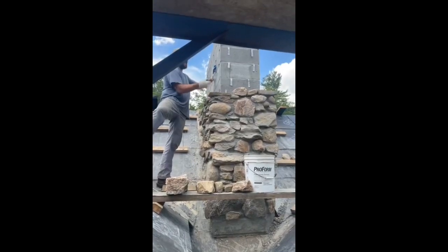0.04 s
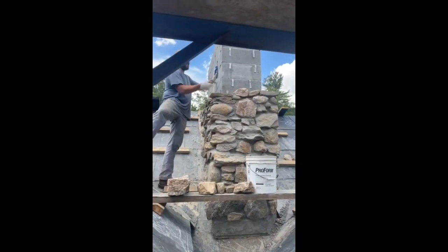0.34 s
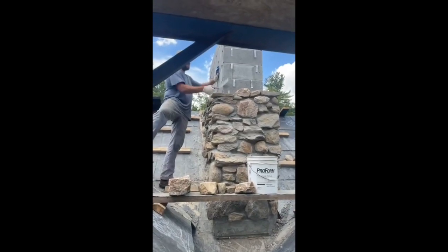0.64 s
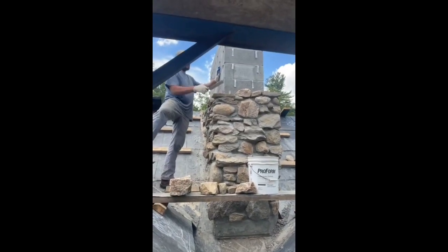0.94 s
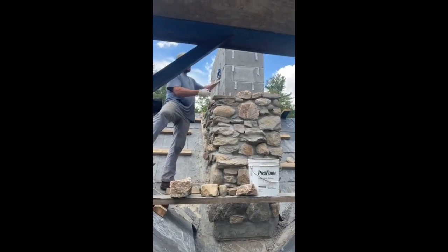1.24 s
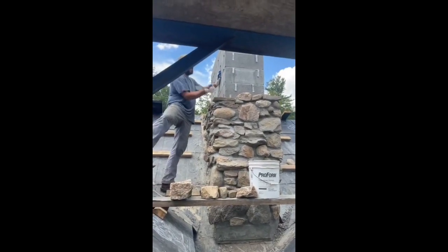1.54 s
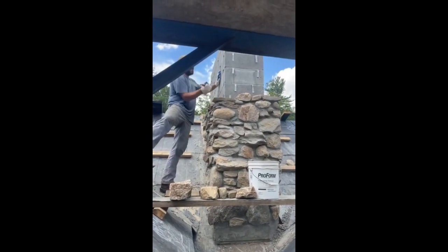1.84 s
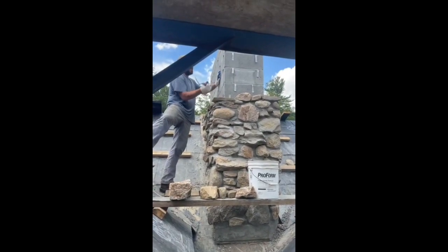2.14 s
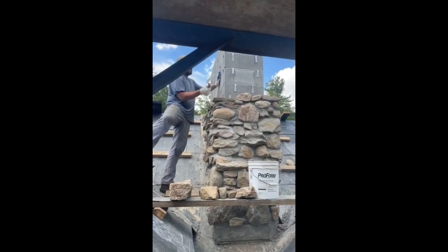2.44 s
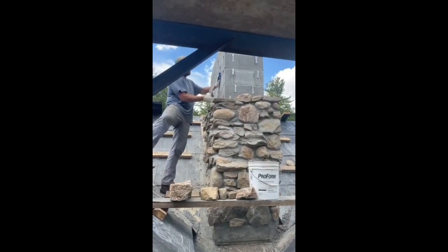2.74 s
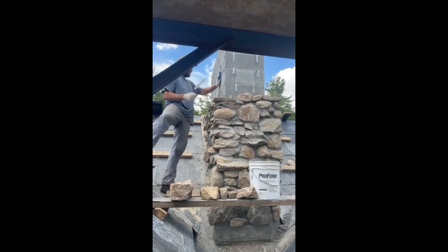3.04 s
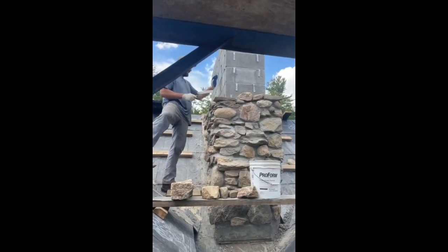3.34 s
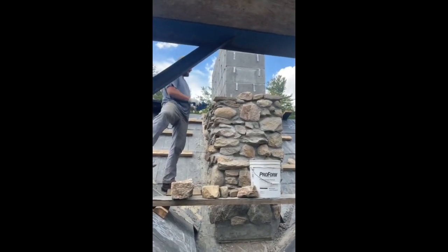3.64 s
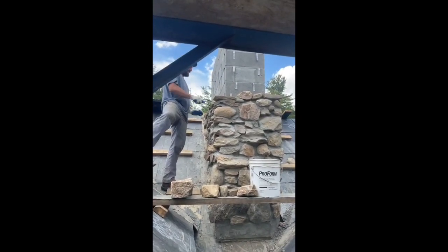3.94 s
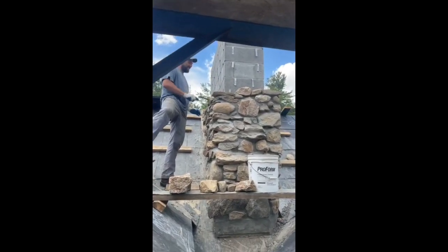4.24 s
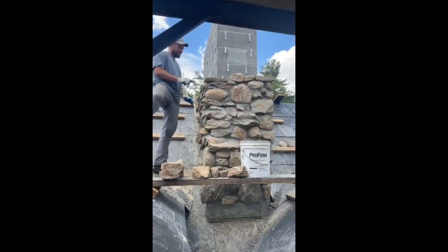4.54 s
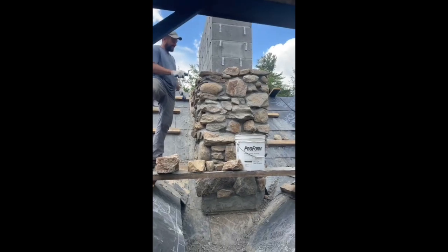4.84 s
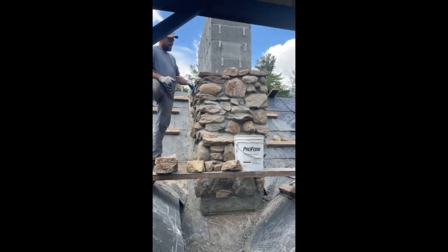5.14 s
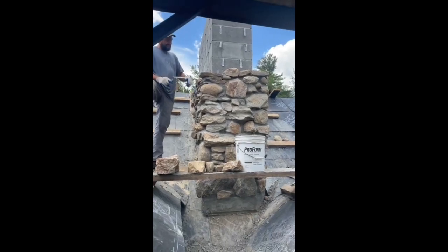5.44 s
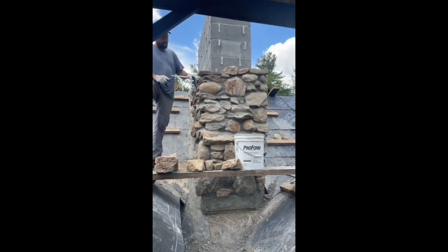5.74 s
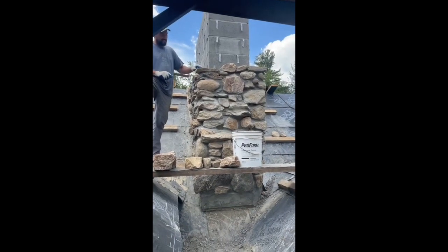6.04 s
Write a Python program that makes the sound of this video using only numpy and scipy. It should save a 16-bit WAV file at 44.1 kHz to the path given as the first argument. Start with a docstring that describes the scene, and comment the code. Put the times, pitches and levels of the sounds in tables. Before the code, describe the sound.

Close, bright clinks of a trowel tapping a stone into mortar, then three quieter scrapes and faint scuffs in still air.

```python
"""Three ringing blows of a steel trowel, then a light tap and four more: a mason beds a stone in mortar.
Outdoors on a scaffold, microphone close to the work. The blade chatters and rings, the stone thuds,
the roof throws the sound back at once and the trees a moment later; crumbs tick down.
Then the blade scrapes three times along the stone, and soft scuffs and a step on the plank follow."""
import sys
import numpy as np
from scipy import signal
from scipy.fft import rfft, irfft
from scipy.io import wavfile
from scipy.ndimage import uniform_filter1d

SR = 44100
rng = np.random.default_rng(int(sys.argv[2]) if len(sys.argv) > 2 else 0)


def output_pcm(signal):
    """Save a mono or channel-first signal as 16-bit PCM at the path in sys.argv[1].

    Samples are clipped to [-1, 1] before scaling.
    """
    pcm = np.clip(np.atleast_2d(signal).T, -1, 1) * 32767
    wavfile.write(sys.argv[1], SR, np.round(pcm).astype(np.int16))


N = 269137
T = np.arange(N) / SR

# Trowel blows. Each row: start in seconds, strength in dB, chatter length in seconds,
# favoured resonance in Hz, low and high ring drive in dB, knock of the stone in Hz.
BLOWS = [(0.0296, -5.5, 0.006, 2300, -0.5, 0.5, 250), (0.3519, -5.5, 0.012, 4230, 6.5, 15, 280),
         (0.6737, -7, 0.0077, 3650, -10.5, -3, 245), (1.385, -49, .003, 2726, 6.5, 21.5, 252),
         (1.6991, -3.5, .0105, 2300, 8.5, 4.5, 335), (2.0414, -6.5, 0.0055, 3980, 2.5, 3, 260),
         (2.3723, -4, 0.0026, 3680, -6, -8, 135), (2.7392, -4, 0.0041, 2230, -5.5, 0, 130)]
# Scraping strokes. Each row: landing and length in seconds, then in dB the level, the landing click,
# that click's treble, the drive of the after-ring and the growl of the stone.
STROKES = [(3.6618, 0.29, -31.5, -30.5, 4.5, -17, -41.5), (4.276, .151, -31, -24.5, 11.5, 7.5, -41),
           (4.702, 0.12, -28.5, -18, -3, 8, -27.5)]
# Colour of grit on stone. Each row: frequency in Hz, spectral level in dB.
GRIT = [(120, -52), (200, -18), (382, -16), (741, -19), (2840, -3.5), (4820, -7), (5320, 2.5), (5780, -7),
        (7920, -3.5), (9670, -11), (10500, -34.5), (13600, -56.5), (22000, -120)]
# Colour of the wash off the leaves, also used for trickling mortar. Each row: frequency in Hz, level in dB.
RUSTLE = [(240, -53.5), (400, -14.5), (1300, -12.5), (2210, -9.5), (2570, -5.5), (2830, 0.5), (3240, -8),
          (8100, -10), (9940, -35.5), (10500, -49.5), (13600, -80), (22000, -120)]
USUAL_CHATTER_S, CLICK_T60_S = 0.0073, 0.06


def from_db(db):
    """Decibels to gain."""
    return 10 ** (np.asarray(db) / 20)


def rms_one(x):
    """Scale to rms 1."""
    return x / np.sqrt(np.mean(x ** 2) + 1e-20)


def convolve(x, response):
    """Pass a sound through an impulse response."""
    return signal.fftconvolve(x, response)[:N]


def response_of(spectrum, size=4096):
    """Minimum-phase impulse response of unit energy, shaped by rows of frequency in Hz and level in dB."""
    hz, db = np.transpose(spectrum)
    grid_hz = np.maximum(np.arange(size // 2 + 1) * SR / size, 1)
    gain = from_db(np.interp(np.log(grid_hz), np.log(hz), db))
    cepstrum = irfft(np.log(gain))
    response = irfft(np.exp(rfft(2 * cepstrum[:size // 2], size)))
    return response / np.linalg.norm(response)


def noise(spectrum):
    """Steady coloured noise of rms 1."""
    return rms_one(convolve(rng.standard_normal(N), response_of(spectrum)))


def resonate(x, hz, width_hz):
    """One resonance, gain 1 at its peak."""
    r = np.exp(-np.pi * width_hz / SR)
    gain = (1 - r * r) / 2
    return signal.lfilter([gain, 0, -gain], [1, -2 * r * np.cos(2 * np.pi * hz / SR), r * r], x + 1e-18)


def brighten(x, treble_db, corner_hz=3500):
    """Tilt the treble against everything below the corner."""
    low = signal.lfilter(*signal.butter(1, corner_hz, fs=SR), x)
    return low * from_db(-treble_db / 2) + (x - low) * from_db(treble_db / 2)


def burst(hold_s, t60):
    """A rush of tiny contacts that holds for a moment, then dies; one second long."""
    return rng.standard_normal(SR) * from_db(-60 * np.clip((T[:SR] - hold_s) / t60, 0, 2))


def ring(hz, t60):
    """One decaying mode of height 1; one second long."""
    return np.sin(2 * np.pi * (hz * T[:SR] + rng.random())) * from_db(-60 * T[:SR] / t60)


def wander(per_s):
    """Random unevenness that changes so many times a second; spread about 1."""
    return np.interp(T * per_s, np.arange(4000), rng.standard_normal(4000))


def grains(per_s, spread_db):
    """Sand grains catch and break at random, a few much harder than the rest."""
    sizes = from_db(spread_db * np.minimum(rng.exponential(1, N), 4))
    signs = rng.choice([-1, 1], N)
    return rms_one(sizes * signs * (rng.random(N) < per_s / SR))


def add(out, start_s, sound):
    """Mix a sound in at a time."""
    start = round(start_s * SR)
    out[start:start + len(sound)] += sound[:N - start]


def outdoor_air(level_db=-69.5):
    """Still air all round the microphone: a faint, steady rush."""
    # Colour of the air. Each row: frequency in Hz, spectral level in dB.
    air_colour = [(15, -48.5), (25, -27), (80, -2), (298, 1.5), (928, -17), (1700, -16), (1930, -13),
                  (3370, -23.5), (5720, -17), (7190, -22), (8160, -17.5), (9490, -18), (10500, -35),
                  (13600, -70.5), (22000, -120)]
    return from_db(level_db) * noise(air_colour)


def trees(x, trunks_db=-34, leaves_db=-41, first_s=0.1, full_s=0.175, t60=1.2):
    """The wood's edge, some 17 m off, answers late: trunks keep the tones, leaves scatter a smooth wash."""
    # Colour of the echo off the trunks. Each row: frequency in Hz, spectral level in dB.
    trunk_colour = [(200, 6.5), (1200, -1), (2200, -5), (4700, -2), (7000, -6.5), (10000, -3)]
    swell = np.clip((T - first_s) / (full_s - first_s), 0, 1) * from_db(-60 * T / t60)
    trunks = noise(trunk_colour) * swell
    echo = convolve(x, trunks / np.linalg.norm(trunks))
    scattered_power = np.abs(convolve(x * x, swell ** 2 / np.sum(swell ** 2)))
    wash = noise(RUSTLE) * np.sqrt(scattered_power)
    return from_db(trunks_db) * echo + from_db(leaves_db) * wash


def roof(x, level_db=-19, t60=0.08, delay_s=0.0091):
    """Scatter from the roof, beams and chimney close to the microphone."""
    response = burst(0, t60) * (T[:SR] > delay_s)
    return from_db(level_db) * convolve(x, response / np.linalg.norm(response))


def trickle(level_db=-60, fade_db_per_s=22, crumb_t60=0.0081, clump_db=4.5):
    """Loose mortar rustles down over the stones in small clumps and thins out after the last blow."""
    fall = grains(per_s=4000, spread_db=2.5) * from_db(clump_db * wander(24))
    patter = convolve(fall, burst(0, crumb_t60))
    since_last_blow = np.maximum(T - BLOWS[-1][0], 0)
    envelope = from_db(level_db - fade_db_per_s * since_last_blow)
    return envelope * rms_one(convolve(patter, response_of(RUSTLE)))


def falling_crumbs(per_s=5, level_db=-62, spread_db=3, treble_db=-5, linger_s=0.85):
    """Bigger crumbs tick down at random during the blows and for a while after."""
    falls = (rng.random(N) < per_s / SR) & (T < BLOWS[-1][0] + linger_s)
    sizes = from_db(level_db + spread_db * rng.standard_normal(N))
    clicks = convolve(falls * sizes, brighten(burst(0, CLICK_T60_S), treble_db))
    return convolve(clicks, response_of(GRIT))


def step(start_s=5.576, level_db=-48.5, t60=0.14):
    """A boot comes down on the scaffold plank."""
    # Colour of the plank. Each row: frequency in Hz, spectral level in dB.
    plank_colour = [(26, -40), (45, -3), (283, 0.5), (858, -11), (1620, -6.5), (1920, -14), (2550, -19),
                    (2850, -35), (4000, -25), (5200, -63), (8800, -120)]
    boot = np.zeros(N)
    add(boot, start_s, from_db(level_db) * burst(0, t60))
    plank = convolve(boot, response_of(plank_colour))
    return signal.sosfilt(signal.butter(2, 55, "high", fs=SR, output="sos"), plank)


def scuffs(rub_db=-1.5, stone_db=-3, release_s=0.009, rustle_db=-16, rustle_s=0.055):
    """The stone is nudged in its mortar: each gritty rub builds up, lets go and leaves sand shifting."""
    # Nudges. Each row: time of the peak in seconds, rise time in seconds, level in dB.
    nudges = [(1.278, .003, -52.5), (1.567, 0.0046, -63), (5.203, 0.0032, -58.5), (5.363, 0.0126, -56),
              (5.401, .007, -61.5), (5.708, 0.02, -63), (5.828, 0.019, -51.5)]
    # Colour of rubbed mortar. Each row: frequency in Hz, spectral level in dB.
    mortar_colour = [(350, -45.5), (600, -21.5), (1370, -13.5), (1540, -10.5), (1750, -10), (2740, -15),
                     (8090, -20.5), (10000, -26), (13000, -43.5), (22000, -120)]
    # Resonances of the stone. Each row: frequency in Hz, width in Hz, relative level in dB.
    stone_modes = [(1390, 33, 4), (1850, 140, -0.5)]
    pressure = np.zeros(N)
    for peak_s, rise_s, db in nudges:
        before, after = np.maximum(peak_s - T, 0), np.maximum(T - peak_s, 0)
        release = np.exp(-after / release_s) + from_db(rustle_db) * np.exp(-after / rustle_s)
        pressure += from_db(db) * np.exp(-before / rise_s) * release
    sand = pressure * grains(per_s=1500, spread_db=2.0)
    rub = convolve(sand, response_of(mortar_colour))
    stone = sum(from_db(db) * resonate(sand, hz, width) for hz, width, db in stone_modes)
    return from_db(rub_db) * rub + from_db(stone_db) * np.std(sand) * rms_one(stone)


def ticks(level_db=-8, ping_db=-28, ping_hz=2736, ping_t60=0.35):
    """Light contacts and the landing of each stroke give a gritty click with a faint ping of the blade."""
    # Blade touching stone. Each row: start in seconds, relative level in dB, treble tilt in dB.
    touches = [(0.269, -30, -19.5), (0.334, -25, -12), (0.979, -36.5, -8), (1.013, -38.5, -13),
               (1.087, -42, -16), (1.122, -41, 0.5), (2.288, -36.5, 0), (3.284, -46.5, 10),
               (4.666, -45.5, -6), (5.514, -43.5, -6)]
    landings = [(start_s, db, treble_db) for start_s, _, _, db, treble_db, *_ in STROKES]
    out = np.zeros(N)
    for start_s, db, treble_db in touches + landings:
        click = brighten(burst(0, CLICK_T60_S), treble_db)
        ping = from_db(ping_db) * ring(ping_hz, ping_t60)
        add(out, start_s, from_db(db + level_db) * (click + ping))
    return convolve(out, response_of(GRIT))


def pressure_db(t, length_s, peak_share=0.65, press_db_per_s=128.5, ease_db_per_s=119, lift_db_per_s=489):
    """Hand pressure through one stroke, 0 dB at its height: lean in, ease off, lift the blade."""
    peak_s = peak_share * length_s
    leaning = press_db_per_s * np.maximum(peak_s - t, 0)
    easing = ease_db_per_s * np.maximum(np.minimum(t, length_s) - peak_s, 0)
    lifting = lift_db_per_s * np.maximum(t - length_s, 0)
    return -(leaning + easing + lifting)


def scrapes(hiss_db=-4.5, body_db=-3, ring_db=-13, catch_db=3, shift_db=5.0, edge_t60=0.048, lift_s=0.08):
    """The blade drags over sand; the grains sound its resonances and leave it ringing."""
    # Blade pressed on stone. Each row: resonance in Hz, width in Hz, relative level in dB.
    pressed_modes = [(1437, 32, -14), (1754, 75, -2), (2518, 88, 3), (2745, 44, 2), (2960, 41, 1.5),
                     (3654, 76, 7.5), (4150, 58, -2), (4427, 140, 6), (5290, 39, 7.5), (5420, 47, 2.5),
                     (6170, 130, -5), (6550, 196, 1.5), (7650, 190, -3), (7930, 80, 6.5), (9470, 67, -1.5)]
    # Modes left ringing. Each row: frequency in Hz, width in Hz, relative level in dB.
    free_modes = [(1126.5, 6.5, -19), (1757, 10, -15), (2736, 6.7, -5), (2942, 7, 0)]
    # Growl of the scraped stone. Each row: frequency in Hz, spectral level in dB.
    growl_colour = [(150, -3), (300, -16), (420, -10), (620, 22), (800, -24), (1400, -6), (2000, -29)]
    sand = rms_one(grains(per_s=3500, spread_db=1.5) * from_db(catch_db * wander(160)))
    # the line of contact moves along the edge, so resonances come and go
    weights = [from_db(db + shift_db * wander(25)) for _, _, db in pressed_modes]
    hiss, growl = convolve(sand, response_of(GRIT)), convolve(sand, response_of(growl_colour))
    rub, drive = np.zeros((2, N))
    for start_s, length_s, level_db, _, _, drive_db, growl_db in STROKES:
        span = (T >= start_s) & (T <= start_s + length_s + lift_s)
        body = sum((-1) ** k * weights[k][span] * resonate(sand[span], hz, width)
                   for k, (hz, width, _) in enumerate(pressed_modes))
        # the edge lies differently in each stroke, which gives a new thicket of small resonances
        edge = rms_one(convolve(hiss * span, burst(0, edge_t60))[span])
        rasp = brighten(from_db(hiss_db) * edge + from_db(body_db) * rms_one(body), treble_db=0.5)
        pressure = from_db(level_db + pressure_db(T[span] - start_s, length_s))
        rub[span] = pressure * (rasp + from_db(growl_db) * growl[span])
        drive[span] = from_db(drive_db) * rub[span]
    after_ring = sum(from_db(db) * rms_one(resonate(drive, hz, width)) for hz, width, db in free_modes)
    return rub + from_db(ring_db) * np.std(rub) * rms_one(after_ring)


def thuds(level_db=-10, shudder_db=-32, shudder_t60=0.23, knock_db=-21.0, knock_t60=0.09):
    """Each blow pushes the stone into the mortar; it knocks on its bed and the masonry shudders briefly."""
    # Colour of the stone in its bed. Each row: frequency in Hz, spectral level in dB.
    bed_colour = [(25, -26), (55, -3), (130, 0), (260, -1), (500, -4.5), (1000, -26)]
    out, bed = np.zeros(N), response_of(bed_colour)
    for start_s, strength_db, chatter_s, *_, knock_hz in BLOWS:
        push = from_db(shudder_db) * burst(0, shudder_t60)
        push[0] += 1   # the impact itself
        push *= from_db(-np.log2(chatter_s / USUAL_CHATTER_S))   # 1 dB less per doubling of the chatter
        knock = from_db(knock_db - 60 * T[:SR] / knock_t60) * np.sin(2 * np.pi * knock_hz * T[:SR])
        add(out, start_s, from_db(strength_db + level_db) * (convolve(push, bed)[:SR] + knock))
    return out


def blows(chatter_t60=0.031, favoured_db=-11, spread_db=5.0, swing_db=4.5, swing_onset_s=0.028):
    """Close to the microphone, the blade chatters on the stone for some milliseconds, then rings freely."""
    # Colour of steel on stone. Each row: frequency in Hz, spectral level in dB.
    clink_colour = [(88, -49.5), (150, -20), (826, -17), (1120, -15), (1460, -9), (2240, -1.5),
                    (2580, -6.5), (2870, 1), (3370, -4), (3680, -0.5), (5440, -1.5), (5840, -4),
                    (7360, -2.5), (9270, -9.5), (10500, -31.5), (13600, -57), (22000, -120)]
    # Modes of the free blade. Each row: frequency in Hz, relative level in dB, seconds to fall 60 dB.
    blade_modes = [(1107, -22.5, 0.15), (1740, -40, .13), (2280, -23.5, .07), (2738, -30, 0.51),
                   (2945, -42, .3), (3294, -34.5, 0.11), (4000, -30, .05), (4245, -37.5, 0.2),
                   (4460, -30, 0.083), (5300, -23, .05), (6400, -36.5, .1), (6760, -32, 0.04),
                   (6850, -23.5, 0.033), (8530, -34, .05), (8450, -44, .08)]
    out, clink = np.zeros(N), response_of(clink_colour)
    tail_s = chatter_t60 / np.log(1e6)   # time constant of the chatter's dying energy
    for start_s, strength_db, chatter_s, favoured_hz, low_db, high_db, _ in BLOWS:
        # a longer chatter spreads the same blow thinner
        level_db = strength_db - 10 * np.log10((chatter_s + tail_s) / (USUAL_CHATTER_S + tail_s))
        crack = brighten(convolve(burst(chatter_s, chatter_t60), clink)[:SR], treble_db=-1.0)
        # the spot that lands favours one short resonance
        favoured = resonate(crack, favoured_hz, width_hz=130)
        favoured *= np.linalg.norm(crack) / np.linalg.norm(favoured)
        add(out, start_s, from_db(level_db) * (crack + from_db(favoured_db) * favoured))
        # the blade swings back, turning its loud side to and fro
        swing = from_db(swing_db * wander(32)[:SR] * np.minimum(T[:SR] / swing_onset_s, 1))
        for hz, mode_db, t60 in blade_modes:
            # the spot also sets the drive of two long bending modes; the rest partly follow the high one
            if hz < 1400:
                drive_db = low_db
            elif 2500 < hz < 2850:
                drive_db = high_db
            else:
                drive_db = 0.5 * high_db + rng.normal(0, spread_db)
            add(out, start_s, from_db(level_db + mode_db + drive_db) * swing * ring(hz, t60))
    return out


def scene():
    """The work, its echoes and the still air, at one microphone on the scaffold."""
    work = blows() + thuds() + ticks() + falling_crumbs() + trickle() + scrapes() + scuffs() + step()
    return (work + roof(work) + trees(work) + outdoor_air())[None]


def limiter(x, threshold_db=-12, slope=0.95, release_db_per_s=230, window=176):
    """Loud blows push the gain down at once; it climbs back while the blade still rings."""
    level_db = 10 * np.log10(np.abs(uniform_filter1d(x * x, window)) + 1e-12)
    over_db = slope * np.maximum(level_db - threshold_db, 0)
    release_db = release_db_per_s * T
    held_db = np.maximum.accumulate(over_db + release_db, axis=-1) - release_db
    return x * from_db(-uniform_filter1d(held_db, window // 2))


def record(dry, ceiling=0.6, low_cut_hz=36, high_cut_hz=10200):
    """Behind the microphone the level is limited, the peaks are rounded, rumble and top are cut."""
    rounded = ceiling * np.tanh(limiter(dry) / ceiling)
    rumble_free = signal.sosfilt(signal.butter(2, low_cut_hz, "high", fs=SR, output="sos"), rounded)
    return signal.sosfilt(signal.ellip(8, 0.2, 55, high_cut_hz, fs=SR, output="sos"), rumble_free)


dry = scene()
out = record(dry)
output_pcm(out)
```